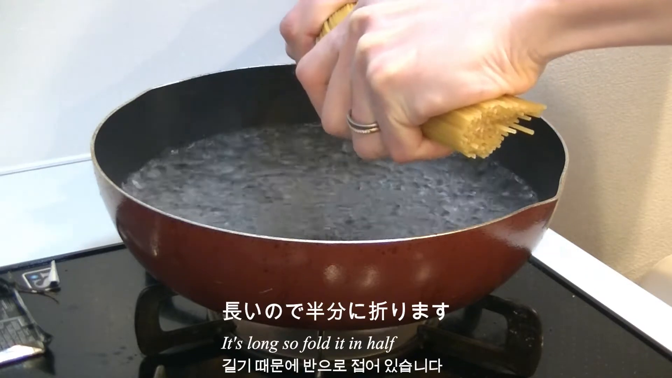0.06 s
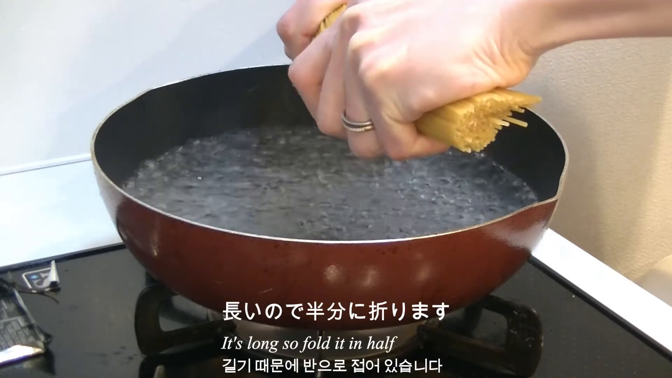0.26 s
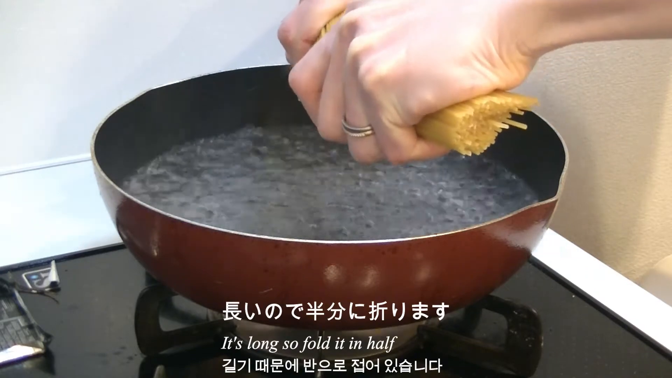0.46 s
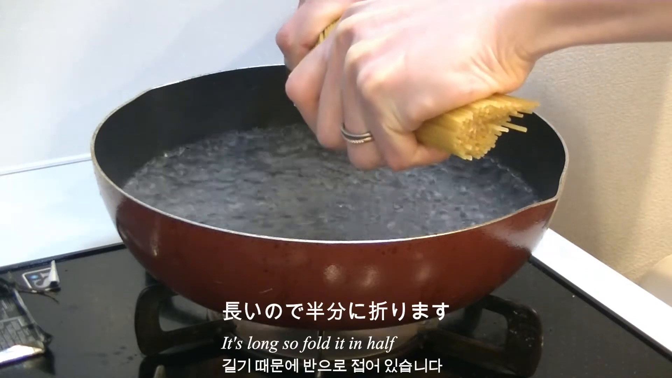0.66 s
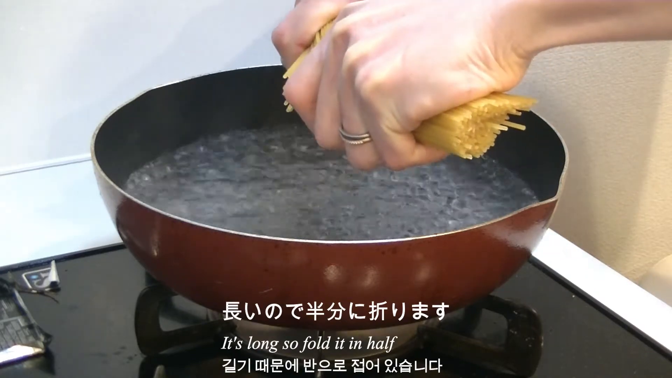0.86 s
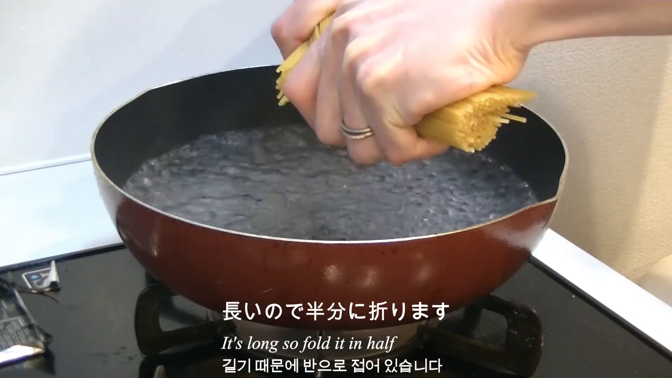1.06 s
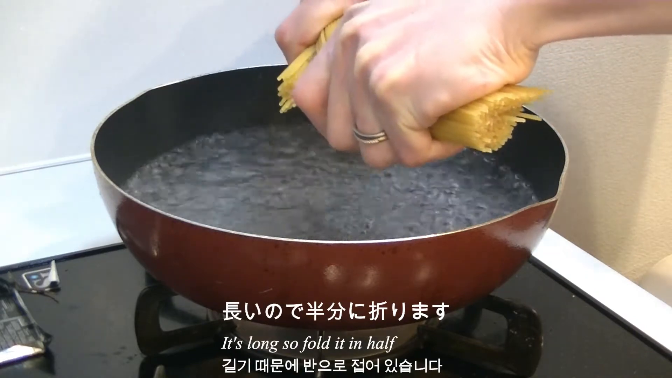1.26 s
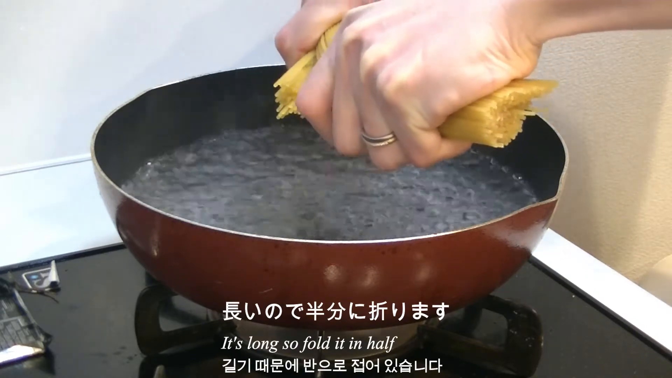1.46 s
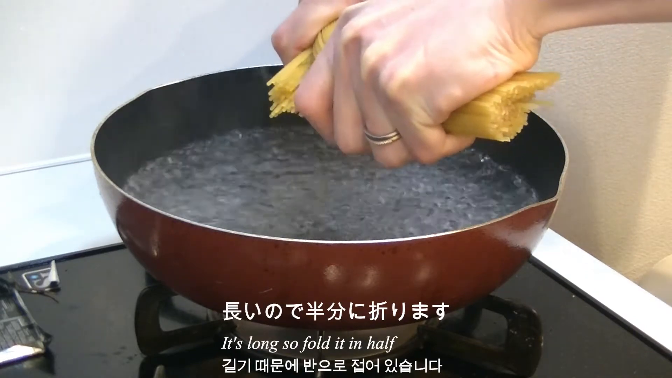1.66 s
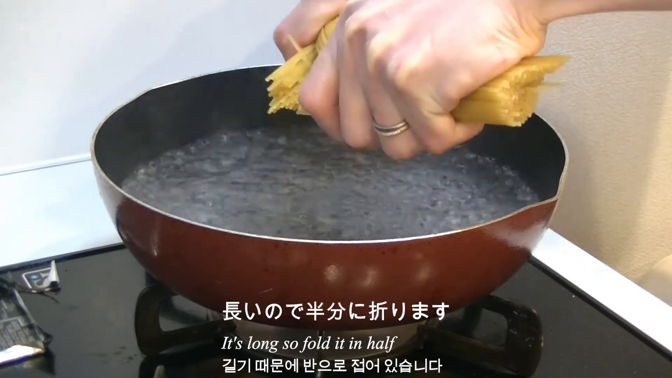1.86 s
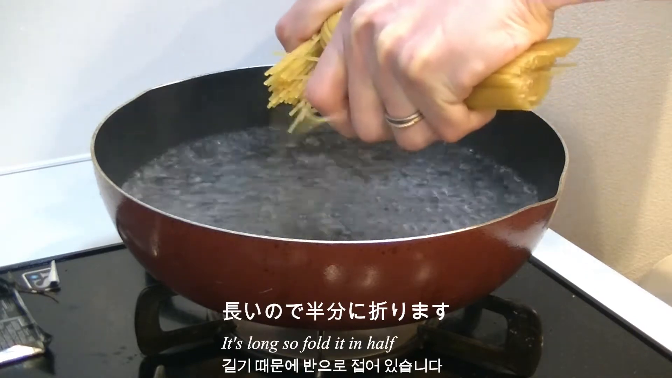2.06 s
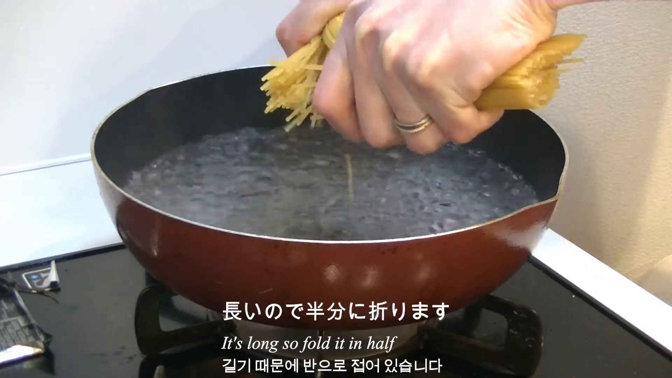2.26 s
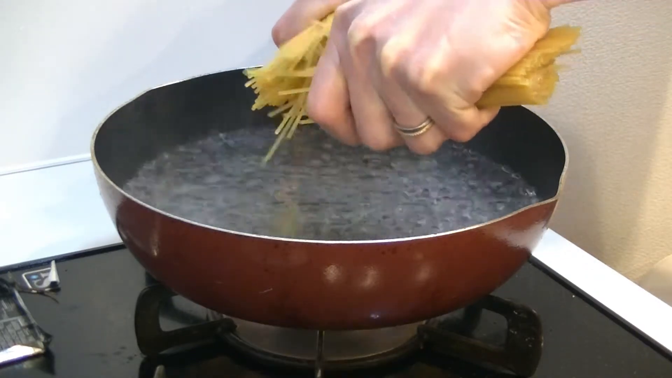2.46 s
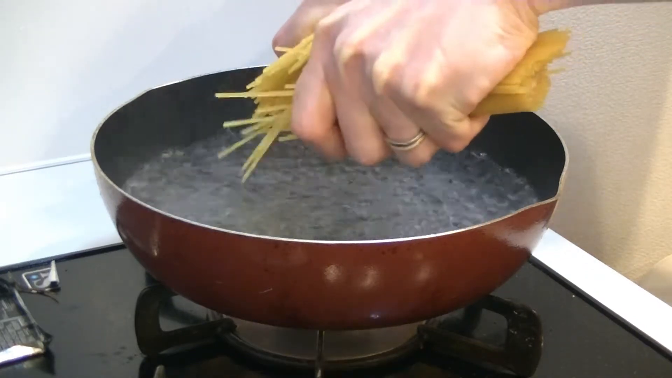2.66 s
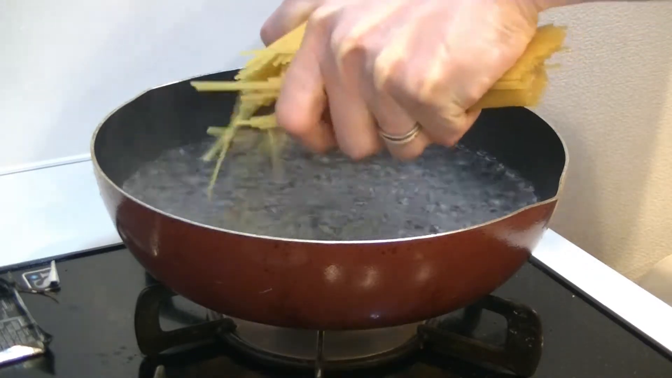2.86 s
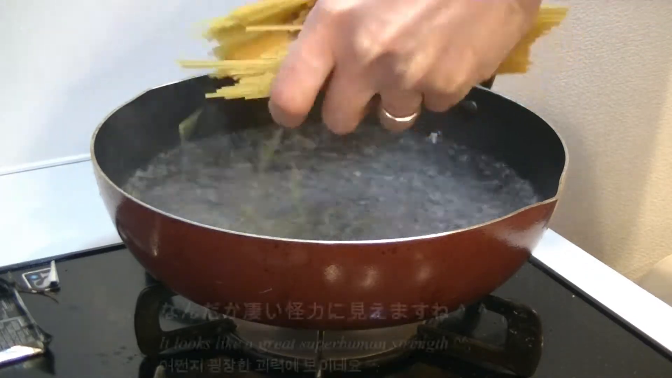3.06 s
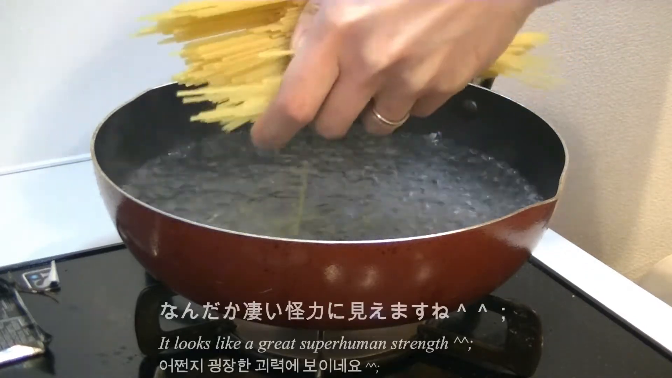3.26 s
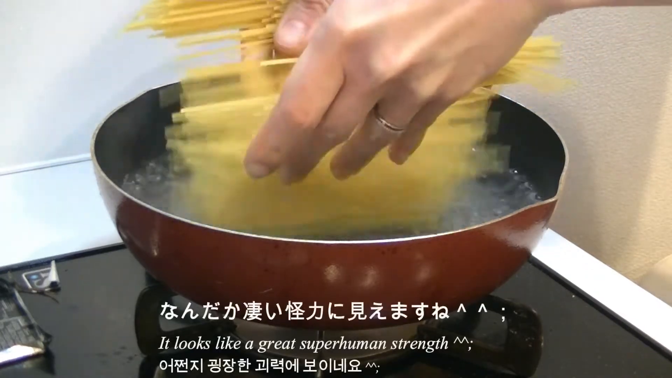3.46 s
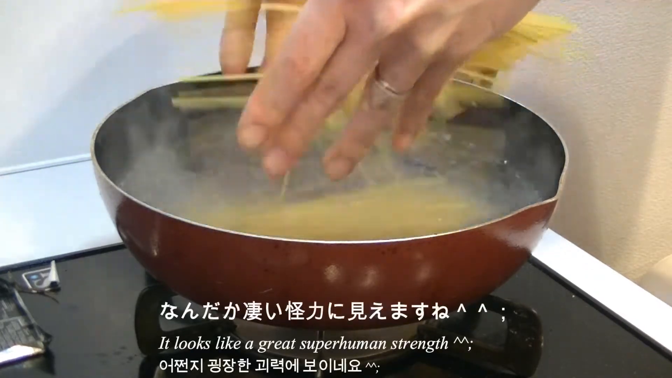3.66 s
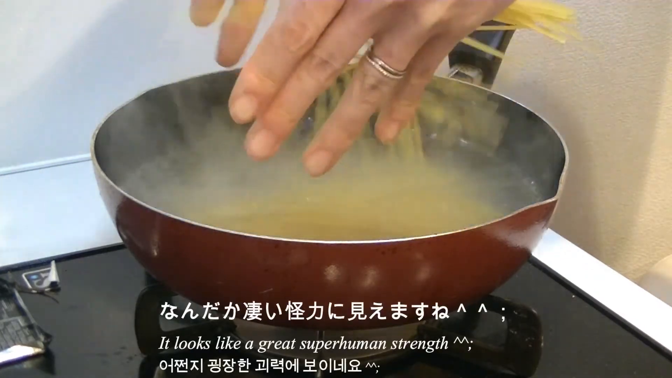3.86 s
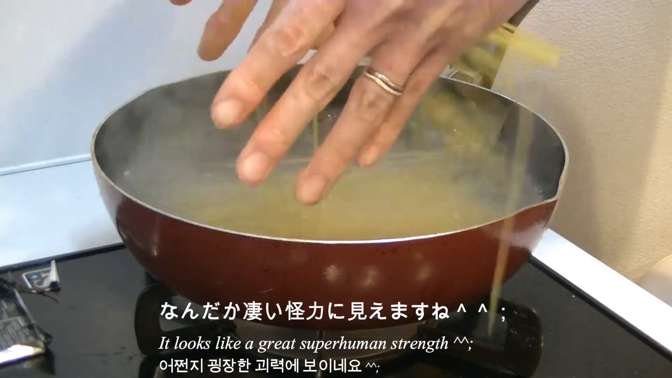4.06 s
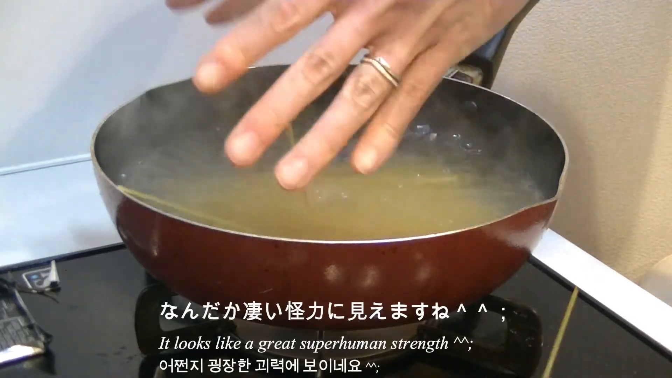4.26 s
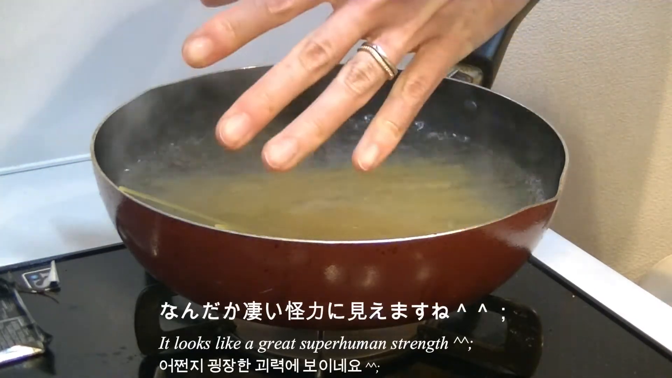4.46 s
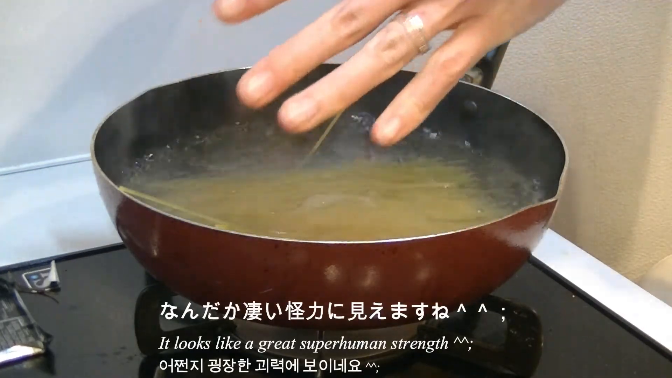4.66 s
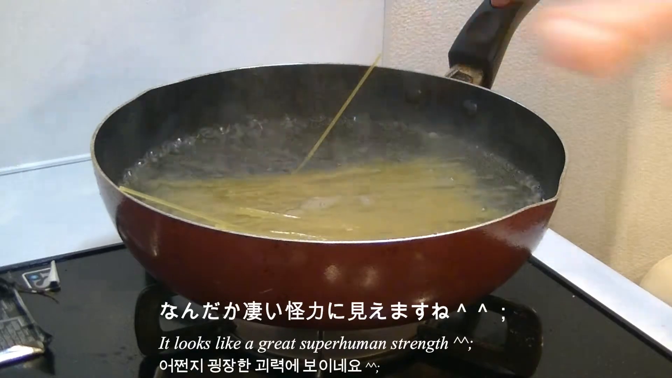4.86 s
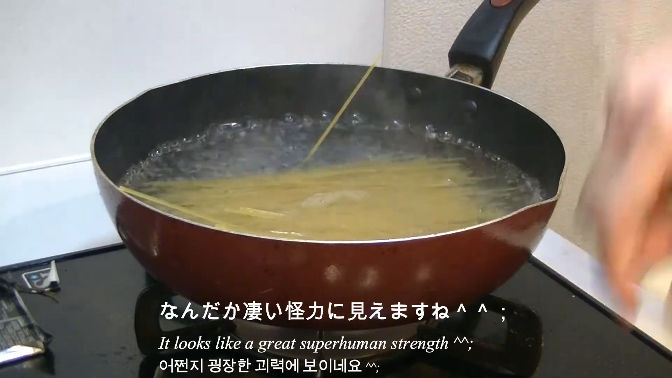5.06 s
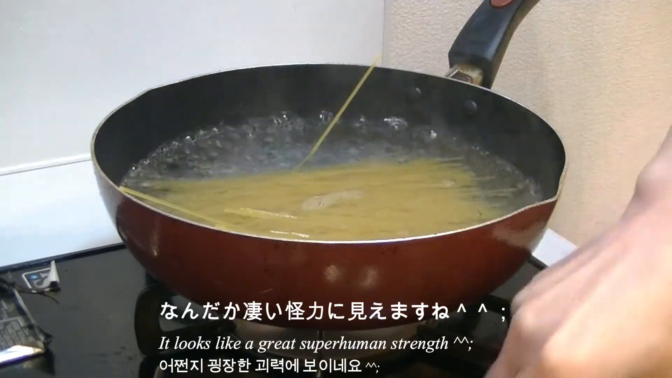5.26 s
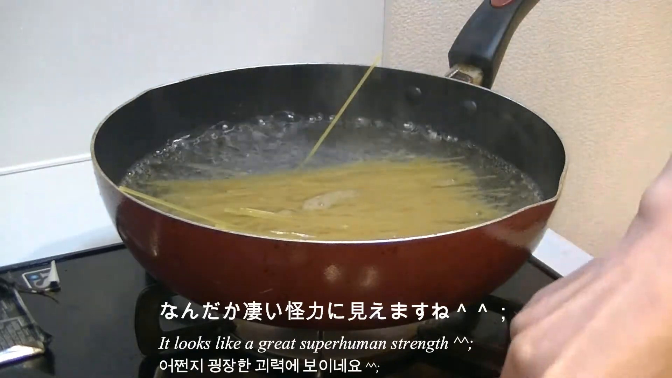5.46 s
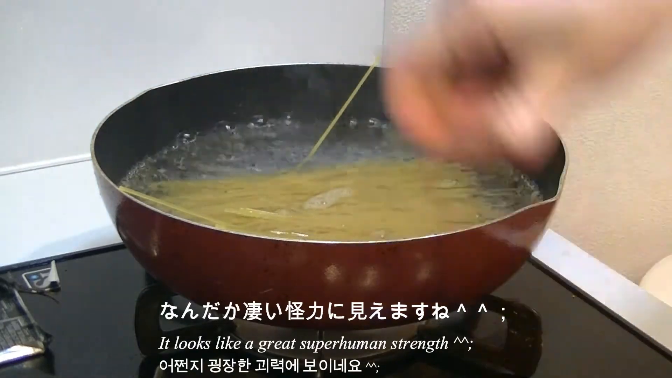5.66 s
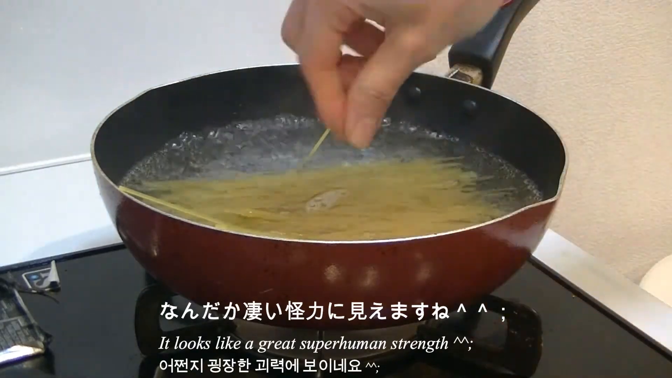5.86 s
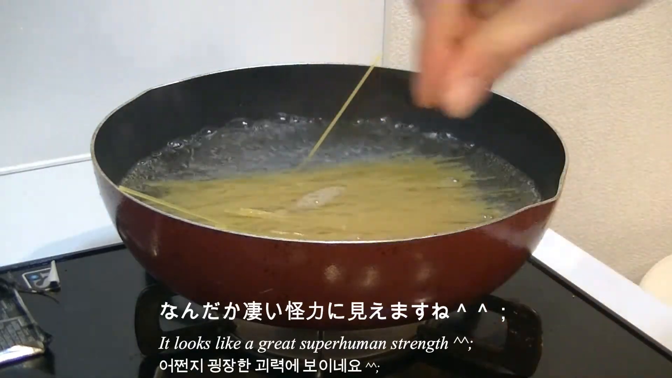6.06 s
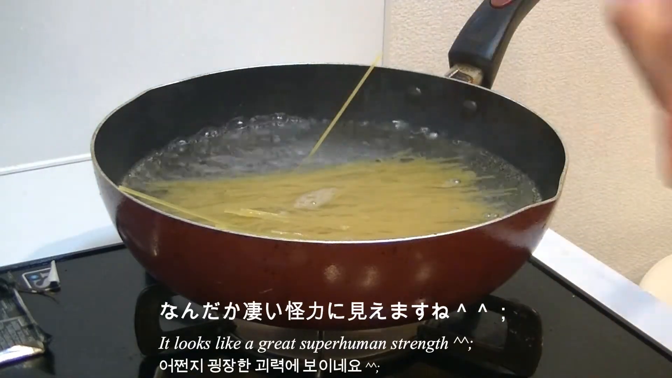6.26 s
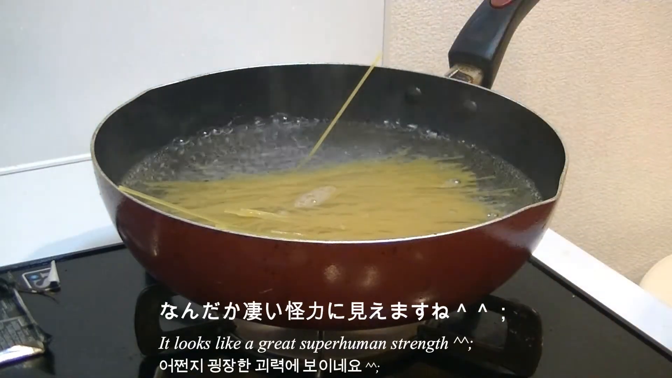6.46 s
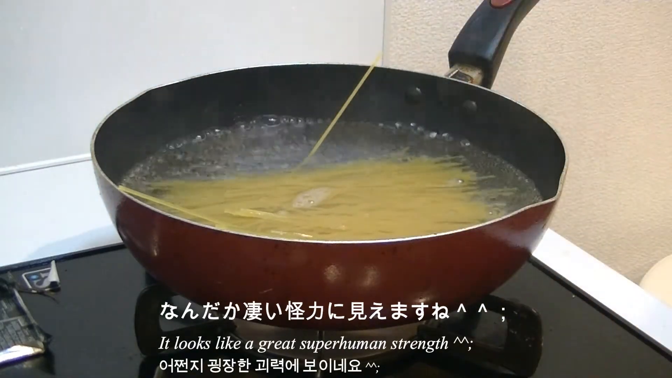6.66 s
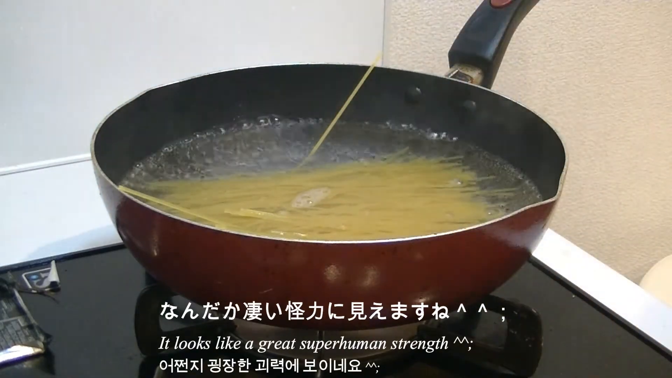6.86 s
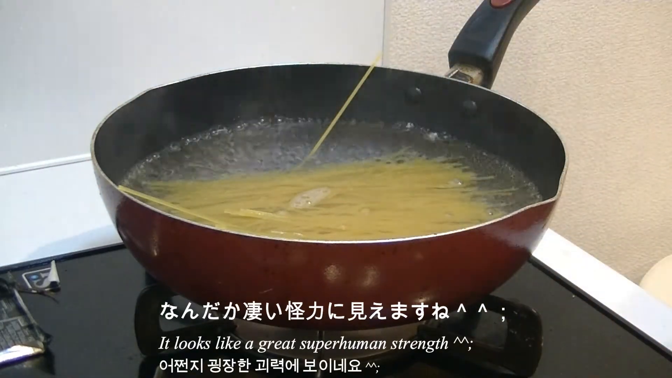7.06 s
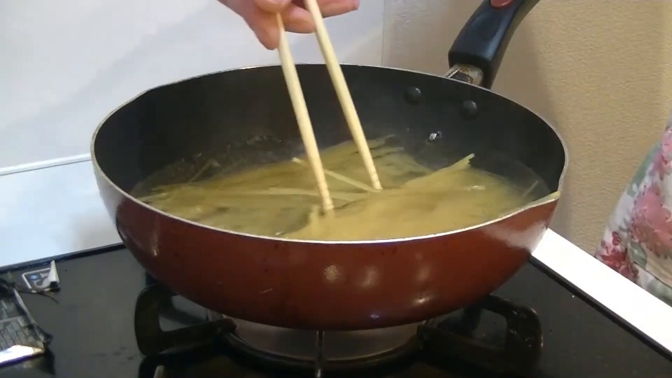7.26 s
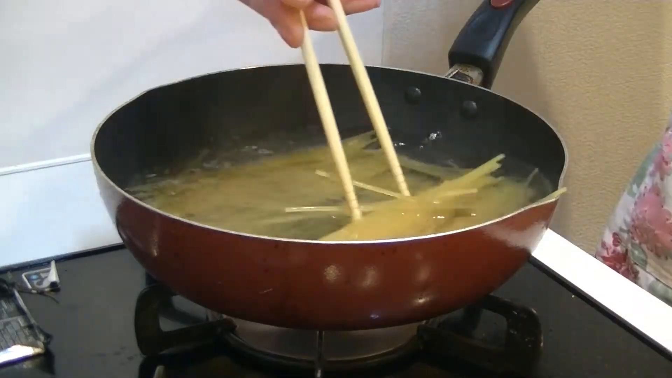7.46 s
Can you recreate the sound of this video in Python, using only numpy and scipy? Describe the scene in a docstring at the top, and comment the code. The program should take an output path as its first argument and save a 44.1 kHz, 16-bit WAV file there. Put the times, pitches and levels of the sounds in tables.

```python
"""Dry spaghetti cracks over boiling water: single snaps and volleys until the bundle gives way,
then the halves slide into the water and stray pieces tick on the pan, all over bubbling and a faint hum.
Snaps are cracks with shivering modes; ticks ring the pan's modes; rubbing is a crackle of tiny rattles.
Bubbles are damped sines over filtered noise; knocks and rumble are filtered noise, and the hum is two sines."""
import sys
import numpy as np
from scipy import signal
from scipy.fft import rfft, irfft, next_fast_len
from scipy.io import wavfile
from scipy.ndimage import uniform_filter1d

SR = 44100
rng = np.random.default_rng(int(sys.argv[2]) if len(sys.argv) > 2 else 0)


def generate_wav(signal):
    """Clip the signal to [-1, 1] and save it as 16-bit WAV at the path in sys.argv[1]."""
    frames = np.transpose(np.atleast_2d(signal))
    scaled = np.clip(frames, -1, 1) * 32767
    pcm = np.round(scaled).astype(np.int16)
    wavfile.write(sys.argv[1], SR, pcm)


N = 331632
TIME = np.arange(N) / SR  # s


def from_db(db):
    """Logarithmic level: decibels become an amplitude gain."""
    return 10 ** (np.asarray(db) / 20)


def rms_one(x):
    """Power normalisation: scale to an rms of 1."""
    return x / np.sqrt(np.mean(x ** 2) + 1e-20)


def peak_one(x, size=132):
    """Short-time power normalisation: the loudest 3 ms get an rms of 1."""
    power = uniform_filter1d(np.mean(x ** 2, axis=0), size)
    return x / np.sqrt(power.max())


def in_time(rows):
    """Linear interpolation: the columns of a curve at every sample."""
    s, *columns = np.transpose(rows)
    return [np.interp(TIME, s, column) for column in columns]


def at_hz(points, hz):
    """Logarithmic pitch scale: interpolate a spectrum over log frequency."""
    f, value = np.transpose(points)
    return np.interp(np.log(np.maximum(hz, 1)), np.log(f), value)


def add(out, s, sound):
    """Superposition: mix a stereo sound in at s seconds."""
    i = max(0, round(s * SR))
    out[:, i:i + sound.shape[1]] += sound[:, :N - i]


def dying(t, t60):
    """Exponential decay: the level falls 60 dB in t60 seconds."""
    return from_db(-60 * t / np.maximum(t60, 1e-4))


def swells(rows, attack_s, release_db_per_s):
    """Addition of powers: each (start, length, dB) rises, holds and dies away, and overlaps add."""
    power = 0
    for start, length, db in rows:
        rise = np.clip((TIME - start) / attack_s, 0, 1)
        fall_db = np.minimum(release_db_per_s * np.maximum(TIME - start - length, 0), 200)
        power = power + (rise * from_db(db - fall_db)) ** 2
    return np.sqrt(power)


def colour(x, *spectra):
    """Minimum-phase filtering: a causal filter with the summed spectra and unit gain for white noise."""
    size = 2 * next_fast_len(x.shape[-1] // 2 + 1024)
    hz = np.fft.rfftfreq(size, 1 / SR)
    gain = rms_one(from_db(sum(at_hz(s, hz) for s in spectra)))
    cepstrum = irfft(np.log(gain))
    # folding the cepstrum onto positive time makes the filter causal
    cepstrum[1:size // 2] *= 2
    cepstrum[size // 2 + 1:] = 0
    response = np.exp(rfft(cepstrum))
    return irfft(rfft(x, size) * response)[..., :x.shape[-1]]


# Likeness of left and right. Each row: frequency in Hz, correlation from 0 to 1.
LIKENESS = [(30, .15), (120, 0.89), (500, 1), (1500, 0.98), (3000, 0.94), (5000, 0.67), (9000, 0.4),
            (16000, 0.077)]


def stereo(pair):
    """Partial coherence: two unrelated signals become left and right, most alike near 500 Hz."""
    size = pair.shape[1]
    alike = np.clip(at_hz(LIKENESS, np.fft.rfftfreq(size, 1 / SR)), 0, .99)
    mid, side = irfft(rfft(pair) * np.sqrt([1 + alike, 1 - alike]), size)
    return np.array([mid + side, mid - side]) / np.sqrt(2)


def drift(rate):
    """Slow random modulation: chance values, rate per second, joined by lines and scaled to rms 1."""
    knots = rng.standard_normal(int(N / SR * rate) + 2)
    return rms_one(np.interp(TIME * rate, np.arange(len(knots)), knots))


def grains(per_s, spread_db):
    """Random impulse process: clicks at chance moments, of uneven size and either sign."""
    sizes = from_db(spread_db * np.minimum(rng.exponential(1, N), 4))
    signs = rng.choice([-1, 1], N)
    return sizes * signs * (rng.random(N) < per_s / SR)


def ring(clicks, hz, t60):
    """Damped resonance: a unit click starts a dying sine of height 1."""
    r, w = dying(1 / SR, t60), 2 * np.pi * hz / SR
    # the tiny offset keeps the filter clear of slow, vanishingly small numbers
    return signal.lfilter([0, np.sin(w)], [1, -2 * r * np.cos(w), r * r], clicks + 1e-18)


def crackle(per_s, spread_db, spectrum, t60, count=14, size=512):
    """Sound texture from many impacts: random clicks, each with one of several brief rattles."""
    out, t = 0, np.arange(size) / SR
    for kind in range(count):
        rattle = stereo(rng.standard_normal((2, size)) * dying(t, t60))
        clicks = grains(per_s / count, spread_db)
        out = out + signal.oaconvolve(clicks[None], rattle, axes=1)[:, :N]
    return rms_one(colour(out, spectrum))


# Spectrum of the kitchen rumble. Each row: frequency in Hz, relative level in dB.
RUMBLE = [(25, -24), (55, -24), (85, -16), (115, 1.5), (150, -4.5), (220, 2.5), (300, -4), (500, -19),
          (1000, -19)]
# Tones of the hum. Each row: frequency in Hz, relative level in dB.
HUM = [(209.9, -71), (360.7, -64)]


def background(rumble_db, hum_db):
    """Broadband and tonal noise: low rumble round the stove, and sines wavering in level and phase."""
    rumble = from_db(rumble_db) * colour(stereo(rng.standard_normal((2, N))), RUMBLE)
    hum = 0
    for hz, db in HUM:
        level = from_db(db + hum_db + 2 * drift(6.5))
        hum = hum + level * np.sin(2 * np.pi * hz * TIME + 1.07 * drift(9.2))
    return rumble + hum


# Dull knocks and plops. Each row: start in seconds, relative level in dB, centre frequency in Hz,
# 60 dB decay time in seconds.
KNOCKS = [(.965, -33.5, 1680, 0.23), (.975, -34.5, 635, 0.045), (2.344, -28, 790, 0.032),
          (2.80, -36.5, 513, 0.25), (5.165, -35, 1730, 0.12), (5.273, -40.5, 292, .14),
          (5.278, -35.5, 600, 0.12), (5.78, -42.5, 220, 0.21), (5.785, -38, 475, 0.12)]


def knocks(level_db, width=0.47, size=8192):
    """Heavily damped contact: a dying noise round one pitch."""
    out, t = np.zeros((2, N)), np.arange(size) / SR
    for s, db, hz, t60 in KNOCKS:
        hump = [(hz * np.exp(-4 * width), -50), (hz, 0), (hz * np.exp(4 * width), -50)]
        noise = stereo(rng.standard_normal((2, size)))
        thud = colour(noise * dying(t, t60), hump)
        add(out, s, from_db(db + level_db) * peak_one(thud))
    return out


def bubbles(per_s, spread_db, cycles, count=30):
    """Bubble resonance: each random burst rings at the pitch of its size, falling 60 dB in some cycles."""
    clicks, dealt = grains(per_s, spread_db), rng.integers(0, count, N)
    out = np.zeros((2, N))
    for k, hz in enumerate(np.geomspace(330, 3200, count)):
        place = from_db(rng.normal(0, 2.83) * np.array([[1], [-1]]))  # opposite tilts left and right
        out += place * ring(clicks * (dealt == k), hz, cycles / hz) * hz
    return rms_one(out)


# Spectra of the boil, its fizz and the splash. Each row: frequency in Hz, relative level in dB.
BUBBLING = [(100, -54), (250, -5.5), (320, -14.5), (450, -3), (650, 1), (790, 2), (890, -8), (1050, -3.5),
            (1270, -4.5), (1500, -7.5), (1740, -3.5), (2250, -3.5), (2650, -15), (16000, -76)]
FIZZ = [(200, -56), (1900, -3.5), (2500, 1), (3300, 2.5), (4100, 2), (4400, -3.5), (4750, 1), (5600, -5.5),
        (7500, -8), (10000, -11), (12500, -20.5), (16000, -34)]
PLUNGE_COLOUR = [(150, -48), (800, -14), (1500, -4), (2200, 6.5), (3200, -2), (6000, -11), (16000, -50)]
# Course of the fizz. Each row: time in seconds, level in dB before its flicker.
FIZZ_LEVEL = [(0, -45.5), (3, -47), (4.6, -46), (5.4, -45), (5.8, -47), (7.13, -47), (7.15, -51),
              (7.52, -52.5)]
# Handfuls let go into the water, also heard rustling. Each row: start in seconds, length in seconds,
# relative rustle level in dB, splash level in dB.
POURS = [(3.353, 0.063, -37.5, -56), (3.45, 0.13, -26, -43), (3.713, 0.16, -32.5, -48),
         (3.82, 0.063, -38.5, -34), (3.934, 0.082, -33.5, -40), (4.07, 0.092, -39, -40),
         (4.147, 0.077, -31, -54)]
POUR_ATTACK_S, POUR_RELEASE_DB_PER_S = 0.054, 158
BUBBLING_DB = -44.5  # the steady boil
# the boil wells up once: (start s, length s, level dB)
SURGE, SURGE_ATTACK_S, SURGE_RELEASE_DB_PER_S = (5.34, 0.053, -50.5), 0.043, 97


def water(wash_db):
    """Superposed bubble sources: single bubbles, a blurred wash, the fizz of the smallest, and splashes."""
    steady = from_db(BUBBLING_DB + 0.37 * drift(9))
    vigour = steady + swells([SURGE], SURGE_ATTACK_S, SURGE_RELEASE_DB_PER_S)
    single = rms_one(colour(bubbles(1800, 2.7, cycles=30.0), BUBBLING))
    wash = rms_one(colour(stereo(rng.standard_normal((2, N))), BUBBLING))
    boil = vigour * rms_one(single + from_db(wash_db) * wash)
    fizz_level = from_db(in_time(FIZZ_LEVEL)[0] + .5 * drift(15))
    fizz = fizz_level * crackle(4000, 2.2, FIZZ, t60=.008)
    splashes = [(s, length, db) for s, length, _, db in POURS]
    plunge = swells(splashes, POUR_ATTACK_S, POUR_RELEASE_DB_PER_S)
    return boil + fizz + plunge * crackle(900, 3.4, PLUNGE_COLOUR, t60=0.043)


# Volleys of small breaks and grinding in the fists. Each row: start in seconds, length in seconds,
# relative level in dB.
VOLLEYS = [(-.01, 0.016, -25.5), (.113, 0.067, -25), (.23, 0.032, -28.5), (1.445, 0.019, -26),
           (1.547, 0.014, -26.5), (1.72, 0.25, -42), (2.178, 0.095, -36.5), (2.34, 0.03, -24.5),
           (2.402, 0.033, -29), (2.447, 0.06, -21.5), (2.55, 0.15, -38.5), (2.81, 0.027, -31.5)]
VOLLEY_ATTACK_S, VOLLEY_RELEASE_DB_PER_S = 0.0083, 277
# The grip loosens and the ends rub. One row: start in seconds, length in seconds, relative level in dB.
LOOSEN = (2.65, 0.9, -46.5)
# Depth of the crunch as more of the bundle gives way; it also deepens the snaps.
# Each row: time in seconds, share from 0 to 1.
CRUSH = [(0, 0), (1.5, 0.33), (2.35, 0.84), (2.55, 0.47), (2.9, 0)]
# Spectra of breaking, crunching and sliding. Each row: frequency in Hz, relative level in dB.
SNAP_COLOUR = [(30, -25.5), (200, -28), (500, -20.5), (700, -21.5), (920, -12), (1200, -8), (2300, -3),
               (3600, -1.5), (5800, 0.5), (9000, 1), (12000, -4), (16000, -17)]
CRUNCH_COLOUR = [(40, -28), (300, -22), (550, -11), (900, -7), (1150, -1.5), (2000, 4.5), (2900, -2.5),
                 (4200, 3.5), (8000, -13.5), (12000, -7), (16000, -27)]
SLIDE_COLOUR = [(40, -35), (180, -20), (400, -16.5), (720, -4), (910, -11.5), (1300, -7), (2300, -5),
                (4000, -1.5), (6000, -4), (8600, -7), (12000, -12), (16000, -28)]


def rubbing(grind_db, small_snaps_db, slide_db):
    """Frictional noise: strands grind and splinter when bent, crunch giving way, and rustle when let go."""
    crush = np.clip(in_time(CRUSH)[0], 0, 1)
    # square roots share the power between bright and deep
    bright = np.sqrt(1 - crush) * crackle(900, 1.9, SNAP_COLOUR, t60=0.008)
    deep = np.sqrt(crush) * crackle(900, 4.8, CRUNCH_COLOUR, t60=0.017)
    small_snaps = from_db(small_snaps_db) * crackle(160, 1.2, SNAP_COLOUR, t60=0.02)
    strain = swells(VOLLEYS + [LOOSEN], VOLLEY_ATTACK_S, VOLLEY_RELEASE_DB_PER_S)
    grind = strain * (from_db(grind_db) * (bright + deep) + small_snaps)
    rustles = [(s, length, db) for s, length, db, _ in POURS]
    flow = swells(rustles, POUR_ATTACK_S, POUR_RELEASE_DB_PER_S)
    slide = from_db(slide_db) * flow * crackle(1400, 1.9, SLIDE_COLOUR, t60=0.029)
    return grind + slide


def fracture(abrupt_db, t60, crack_db, rise_s, scatter_db, scatter_t60, count=120, size=6144):
    """Sudden release of strain: a short crack, then fragments shiver in chance modes and shake the bundle."""
    t = np.arange(size) / SR
    crack = from_db(abrupt_db + crack_db) * rng.standard_normal((2, size)) * dying(t, .003)
    modes = np.zeros((2, size // 2 + 1), complex)
    phases = 2 * np.pi * rng.random((2, count))
    modes[:, rng.integers(1, size * 3 // 8, count)] = np.exp(1j * phases)
    # a gradual break spreads from strand to strand, so it takes longer to swell
    swell = 1 - np.exp(-t / (rise_s * from_db(-abrupt_db)))
    shiver = rms_one(irfft(modes)) * dying(t, t60)
    scatter = from_db(scatter_db) * rng.standard_normal((2, size)) * dying(t, scatter_t60)
    return stereo(crack + swell * (shiver + scatter))


# Loose pieces striking the pan. Each row: start in seconds, relative level in dB,
# ring relative to that level in dB, frequency in Hz where the pan rings most.
TICKS = [(1.768, -19.5, -6.5, 4530), (2.979, -26, -16, 5500), (3.009, -30, -9, 4370),
         (3.052, -26, -17, 6100), (3.1, -15.5, -31, 5760), (3.145, -16.5, -12, 7950),
         (3.949, -26, -24, 8000), (3.963, -18.5, -20, 9000), (4.027, -22, -20, 12100),
         (4.06, -22.5, -9.5, 6800), (4.084, -20, -12, 11000), (4.109, -21.5, -17, 9000),
         (4.148, -24.5, -8.5, 4100), (4.178, -22, -8, 5900), (4.189, -22, -22, 7000),
         (4.222, -21, -18, 6500), (4.247, -22.5, -23, 6000), (4.385, -31.5, -9, 4450),
         (4.432, -26, -8.5, 5800), (4.514, -24.5, -28, 4200), (4.564, -39, -22, 6000),
         (4.902, -49, 6, 3600), (5.902, -27.5, -8, 4800), (5.929, -37, -20, 5000)]
# Spectrum of the click. Each row: frequency in Hz, relative level in dB.
TICK_COLOUR = [(40, -29), (300, -17), (1000, -5), (2000, -1.5), (4800, -1.5), (6800, 7), (10000, 2.5),
               (13000, -5.5), (16000, -15)]
# Modes of the pan. Each row: frequency in Hz, relative level in dB, 60 dB decay time in seconds.
PAN = [(4140, -1, .15), (4722, -7, .22), (5310, -5, .18), (6068, -1, .23), (6272, -9, .18), (6900, -6, .22),
       (7580, -2, .13), (7962, -7, .18), (8694, -6, .11), (9259, -12, .18), (10630, -10, .1),
       (12270, -3, .1)]
# a harder contact rings higher and clicks brighter
TICK_TOP_DB_PER_OCTAVE, TICK_NEUTRAL_HZ = 13.5, 6000


def ticks(level_db, size=16384):
    """Modal excitation: a dry piece clicks on the pan and rings its modes, differently at every spot."""
    out, t = np.zeros((2, N)), np.arange(size) / SR
    hz, mode_db, t60 = np.transpose(PAN)
    modes = np.sin(2 * np.pi * hz[:, None] * t) * dying(t, t60[:, None])
    for s, db, ring_db, ring_hz in TICKS:
        top_db = TICK_TOP_DB_PER_OCTAVE * np.log2(ring_hz / TICK_NEUTRAL_HZ)
        tilt = [(8000, 0), (13000, top_db)]
        click = fracture(-2.5, t60=0.035, crack_db=2.5, rise_s=0.00054, scatter_db=-32, scatter_t60=0.13)
        add(out, s, from_db(db + level_db) * peak_one(colour(click, TICK_COLOUR, tilt)))
        # modes weaken by 20 dB per octave away from the favoured frequency
        favoured_db = mode_db - 20 * np.abs(np.log2(hz / ring_hz))
        strengths = from_db(favoured_db + rng.standard_normal((2, len(PAN))))
        signs = rng.choice([-1, 1], len(PAN))
        add(out, s, from_db(db + ring_db) * ((strengths * signs) @ modes))
    return out


# The loud breaks. Each row: start in seconds, relative level in dB, brightness of the top in dB,
# abruptness in dB.
SNAPS = [(0.0246, -18.5, -3, 5), (.037, -14.5, -10, 11), (0.0579, -16.5, 0, 3), (0.07, -16.5, -17, 8),
         (.1215, -16.5, 0.5, -2), (0.1687, -13, 1, 2), (0.2, -18, -3, 4), (0.207, -16, -4, 0),
         (0.2405, -12, 3.5, 14), (.274, -12.5, 1.5, 19), (0.4192, -17.5, 1, 12.5), (0.463, -15.5, 4, 8),
         (.4867, -17, -1, 5), (0.4994, -21.5, -11, 8), (0.5201, -12.5, -6.5, 9), (0.5683, -16.5, 6.5, 0),
         (.6511, -19.5, -12, 6.5), (.767, -27.5, 0, 4), (.828, -22, -2, -12.5), (1.091, -34, -13, 5),
         (1.2473, -21.5, -10, -0.5), (1.354, -22.5, 4, -3), (1.3958, -28.5, 3, -4), (1.4106, -22.5, 3, 3),
         (1.4644, -20.5, 3, -4), (1.4795, -20.5, -9, 8), (1.5466, -13.5, -2, 6), (1.567, -17.5, -1, -3),
         (1.6636, -15.5, -3, 8), (1.6757, -23.5, 2, 8), (1.7187, -15, 4.5, 6.5), (1.744, -22.5, -1, 4),
         (1.7668, -19.5, 10, -6), (1.8167, -14.5, 0.5, 11), (1.8568, -16, 2, 0), (1.897, -21, -2, 2),
         (1.9159, -19, -3, -7.5), (1.991, -20, -6.5, 2), (2.011, -25.5, -1, -10.5), (2.0946, -21.5, -2, 4),
         (2.168, -26.5, -1, -2), (2.1903, -17.5, -4, -3), (2.213, -19, 2, 9), (2.2422, -21, -2, 2),
         (2.313, -26, -1, 7), (2.3435, -8.5, -20, 19), (2.4204, -18.5, -2, 0), (2.462, -16.5, -4, -2),
         (2.5062, -14, 1, 6), (2.6416, -21, -4.5, -2), (2.7972, -18.5, -2, -0.5), (2.823, -25, -2, 1),
         (3.2406, -15.5, -5, 7)]
# low body of a lone break; its gain when the whole bundle gives way
WEIGHT_DB, CRUSH_WEIGHT_DB = -8, 12


def snaps(level_db):
    """Brittle fracture: each break has its own sharpness, deeper the more strands give way at once."""
    out = np.zeros((2, N))
    for s, db, top_db, abrupt_db in SNAPS:
        weight_db = WEIGHT_DB + CRUSH_WEIGHT_DB * np.interp(s, *np.transpose(CRUSH))
        tilt = [(120, 0), (450, weight_db), (1700, weight_db), (3800, 0), (7000, 0), (11000, top_db)]
        burst = fracture(abrupt_db, t60=.027, crack_db=3, rise_s=.0008, scatter_db=-11, scatter_t60=.07)
        add(out, s, from_db(db + level_db) * peak_one(colour(burst, SNAP_COLOUR, tilt)))
    return out


# Reverberation of the kitchen. Each row: frequency in Hz, 60 dB decay time in seconds.
KITCHEN_T60 = [(200, 0.18), (1500, 0.13), (5000, 0.29), (9000, 0.24), (15000, 0.18)]


def kitchen(x, tail_db, build_s, size=24000):
    """Reverberation: the room's echo builds up quickly and each band dies at its own rate."""
    t = np.arange(size) / SR
    spectrum = rfft(stereo(rng.standard_normal((2, size))))
    hz = np.fft.rfftfreq(size, 1 / SR)
    edges = [0, 800, 2500, 5000, 8000, 11000, SR / 2]
    tail = 0
    for lo, hi in zip(edges, edges[1:]):
        band = irfft(spectrum * (hz >= lo) * (hz < hi))
        tail = tail + band * dying(t, at_hz(KITCHEN_T60, (lo + hi) / 2))
    build = 1 - np.exp(-t / build_s)
    response = from_db(tail_db) * rms_one(tail * build) / np.sqrt(size)
    return x + signal.oaconvolve(x, response, axes=1)[:, :N]


def scene():
    """Near and far sources: pasta close to the microphone, water and kitchen behind it."""
    far = background(rumble_db=-60.5, hum_db=2) + knocks(level_db=-1.5) + water(wash_db=-0.5)
    pasta = rubbing(grind_db=-1.5, small_snaps_db=-2, slide_db=-1.5) + ticks(level_db=-4) + snaps(level_db=2)
    return far + kitchen(pasta, tail_db=-7.0, build_s=0.0014)


# Balance of the two capsules. Each row: frequency in Hz, left minus right in dB.
BALANCE_DB = [(60, 2), (130, -2.5), (500, -1.5), (2000, -0.5), (5000, -1), (8500, -1.5), (13000, 1.5)]
CUTOFF_HZ = 15900


def record(dry):
    """Transducer limits: the two capsules differ a little, the highest peaks clip and the top is cut."""
    lean_db = at_hz(BALANCE_DB, np.fft.rfftfreq(N, 1 / SR)) / 2
    heard = np.clip(irfft(rfft(dry) * from_db([lean_db, -lean_db]), N), -1, 1)
    # order 10, 0.2 dB ripple, 80 dB stopband
    low_pass = signal.ellip(10, .2, 80, CUTOFF_HZ, fs=SR, output="sos")
    return signal.sosfilt(low_pass, heard)


dry = scene()
out = record(dry)
generate_wav(out)
```